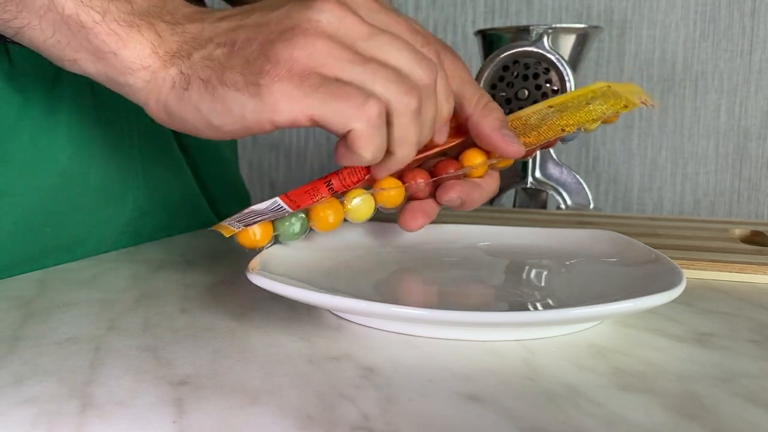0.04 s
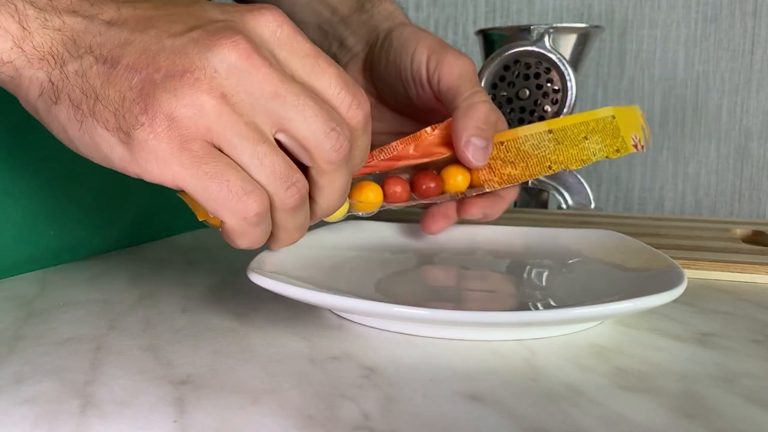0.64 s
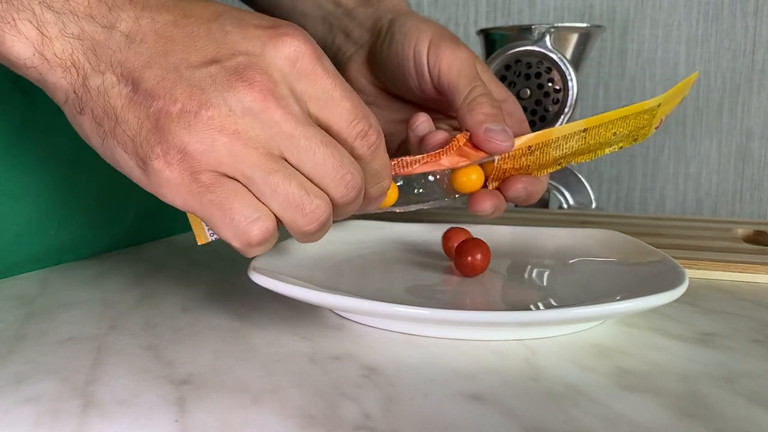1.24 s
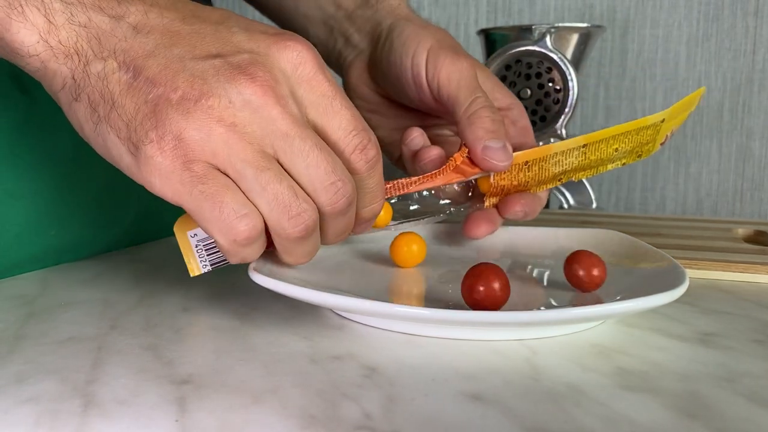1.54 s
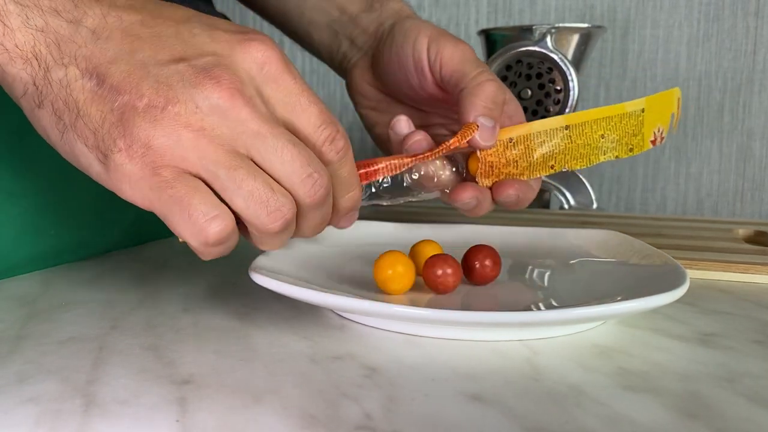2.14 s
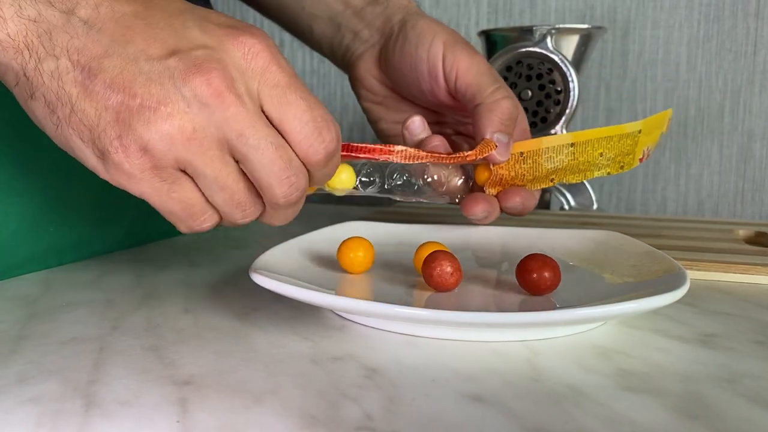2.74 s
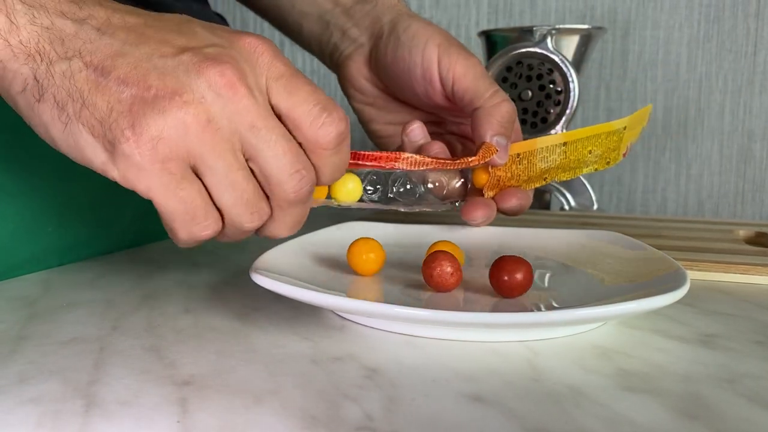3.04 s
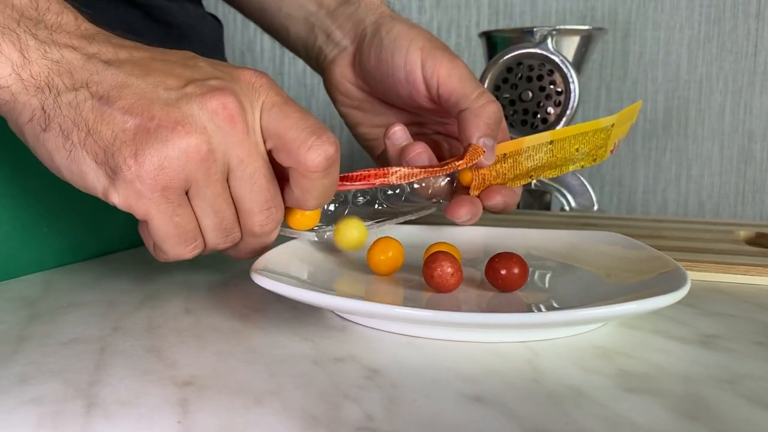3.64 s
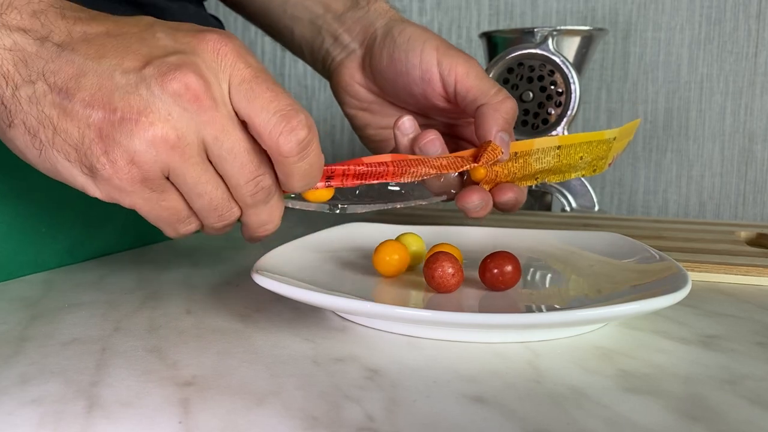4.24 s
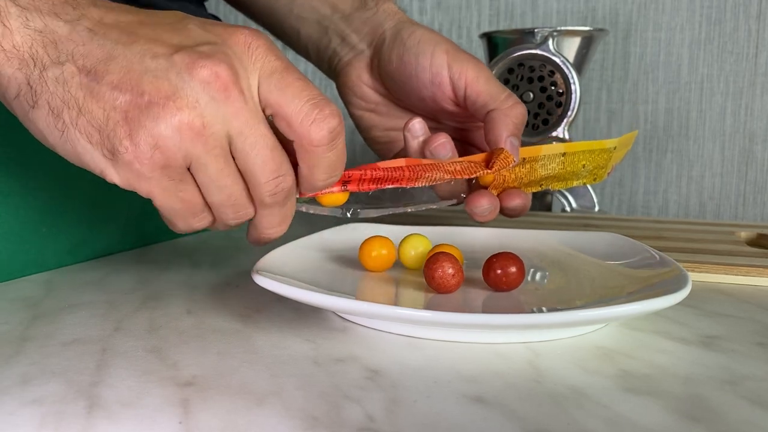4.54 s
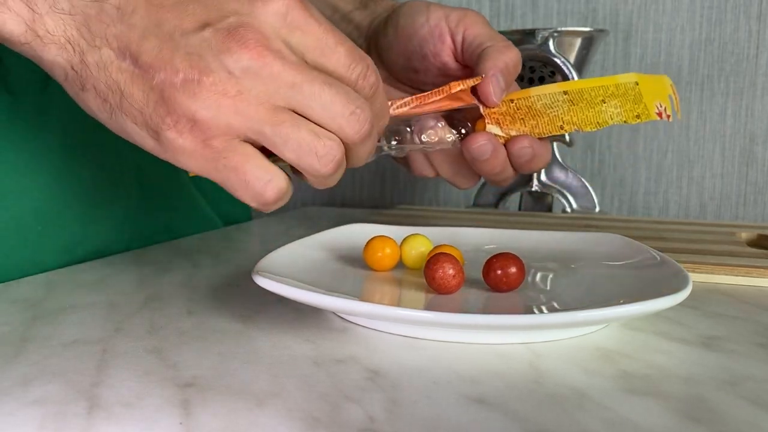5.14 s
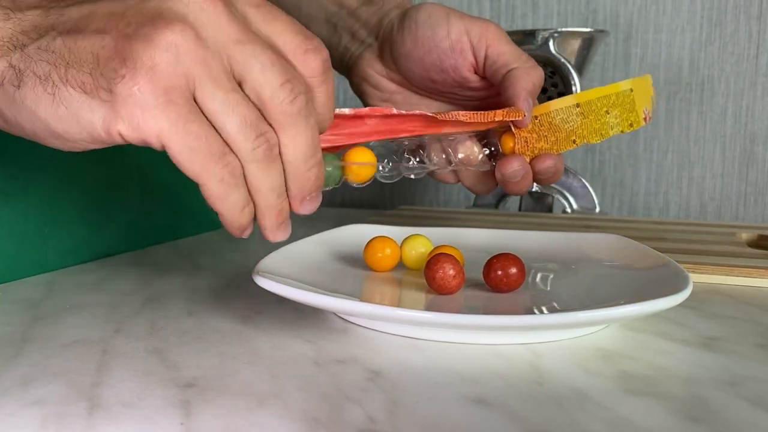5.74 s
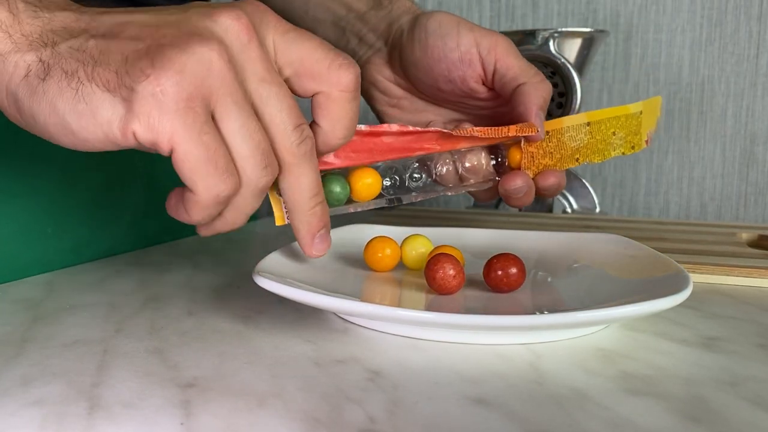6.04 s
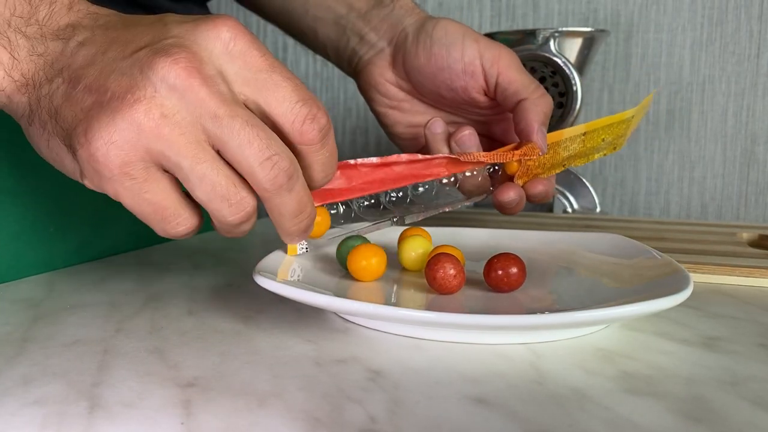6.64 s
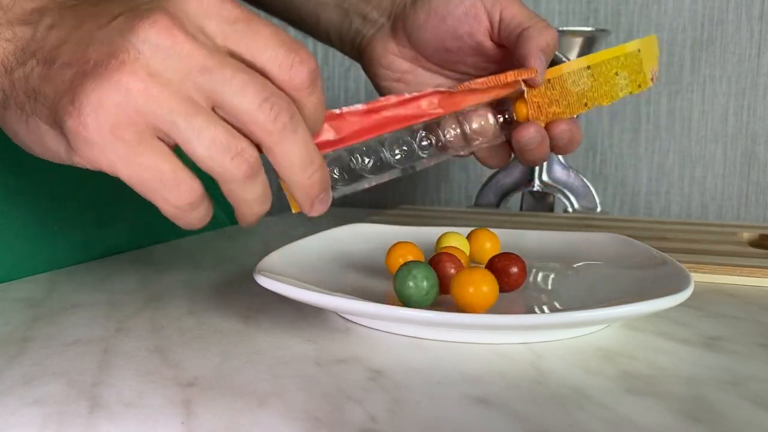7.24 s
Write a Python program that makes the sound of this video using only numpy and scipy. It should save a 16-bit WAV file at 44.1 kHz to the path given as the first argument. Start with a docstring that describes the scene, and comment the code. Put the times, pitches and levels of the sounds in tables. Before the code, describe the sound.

Foil rustles and stiff plastic crackles as a blister strip is opened by hand, heard up close over a quiet kitchen hum. Four hard candies drop early onto a ceramic plate, each with a knock and a ring. Another follows amid a busy run of sharp plastic pops, then three more once the wrapper falls quiet. The small room adds a short echo.

```python
"""Over the quiet hum of a small kitchen, hands peel the foil off a plastic blister strip close to a phone:
the film rustles and the shell buckles in sharp snaps. After a second, four hard candies fall onto a
ceramic plate, which knocks on the stone counter and rings; they hop and roll. The snaps crowd together
as a fifth falls near 3.7 s. From 6.3 s the film is silent, and the last three candies land.
The room answers each snap and clink with a short echo."""
import sys
import numpy as np
from scipy import signal
from scipy.fft import rfft, irfft
from scipy.io import wavfile
from scipy.ndimage import uniform_filter1d, minimum_filter1d

SR = 44100
rng = np.random.default_rng(int(sys.argv[2]) if len(sys.argv) > 2 else 0)


def bounce(signal):
    """Save signal as a 16-bit WAV file at the path given by the first command-line argument."""
    frames = np.transpose(np.atleast_2d(signal))
    limited = np.clip(frames, -1, 1)
    pcm = np.round(limited * 32767).astype(np.int16)
    wavfile.write(sys.argv[1], SR, pcm)


N = 321489

# spectrum of the kitchen's background: (frequency [Hz], relative density [dB])
HUM_COLOUR = [(20, -29), (32, -16), (50, 6), (70, 5.5), (110, -2), (200, -4), (400, -13.5), (560, -2),
              (680, -12.5), (900, -8), (1500, -23), (2700, -26.5), (7000, -41), (16000, -41)]
# spectrum of the kitchen's echo: (frequency [Hz], relative level [dB])
ROOM_COLOUR = [(100, -1.5), (500, 7), (2000, 1), (6000, 6), (15000, -3)]
# reverberation time of the kitchen: (frequency [Hz], t60 [s])
ROOM_T60 = [(150, 0.25), (1000, 0.26), (4000, 0.42), (14000, 0.13)]
# finger strokes along the film: (start [s], length [s], relative rustle [dB], relative fizz [dB])
STROKES = [(0.0, .12, -49.5, -56), (0.228, 0.17, -45, -53), (0.438, 0.12, -52.5, -55.5),
           (0.619, .19, -46, -56.5), (0.884, 0.083, -44, -49), (1.034, 0.15, -51.5, -56),
           (2.069, 0.012, -41, -58), (2.147, 0.014, -44, -54), (2.258, 0.15, -46, -58.5),
           (2.471, 0.15, -59.5, -63), (2.656, 0.066, -55, -66), (2.736, 0.19, -45.5, -58.5),
           (3.138, 0.019, -52.5, -64), (3.237, 0.047, -46, -51), (3.417, 0.051, -52.5, -59),
           (3.504, 0.21, -46, -54), (3.93, 0.1, -52, -46), (4.106, 0.16, -46.5, -54.5),
           (4.247, 0.25, -51.5, -47.5), (4.545, 0.068, -42.5, -43), (4.68, 0.21, -50.5, -58.5),
           (5.023, 0.17, -48, -60.5), (5.168, 0.24, -52, -53), (5.685, .19, -44.5, -49.5),
           (5.773, 0.033, -32, -35), (5.962, 0.048, -49, -49.5), (6.113, 0.015, -48, -60.5),
           (6.207, 0.079, -57, -63)]
# spectrum of the film's papery rustle: (frequency [Hz], relative level [dB])
RUSTLE_COLOUR = [(300, 1), (700, 7.5), (1200, 2), (1900, 7.5), (3000, 3.5), (4500, -3), (7000, -14.5),
                 (10000, -44)]
# spectrum of the film's fine fizz: (frequency [Hz], relative level [dB])
FIZZ_COLOUR = [(3000, -17), (6000, -7.5), (8500, -5.5), (11500, -6), (15500, -6.5), (17000, -40)]
# buckles of the shell: (time [s], relative body level [dB], body centre [Hz],
# body half-width [octaves], relative crack level [dB], body t60 [ms])
SNAPS = [(0.2467, -25, 1080, 1.3, -35, 3.2), (0.368, -36.5, 2080, 1, -55, 22),
         (0.4587, -35.5, 2630, 0.26, -46, 11), (0.4737, -27, 3900, 1.04, -58, 1.6),
         (0.8564, -32.5, 1380, 1.3, -52, 5.7), (0.8991, -23, 3150, 1.07, -45.5, 3.7),
         (1.037, -39, 2660, 2.7, -31.5, 5.8), (1.349, -32, 3240, 1.9, -34, 2.4),
         (1.3631, -32, 2010, 0.98, -42, 3), (2.1061, -37, 2080, 0.79, -46, 3.5),
         (2.3342, -30.5, 1430, 1.18, -43, 32), (2.5397, -35, 1908, 1.02, -57, 4.1),
         (2.634, -34.5, 3770, 0.37, -71, 8.1), (2.7175, -39, 1915, 2.2, -31, 2.5),
         (2.808, -26.5, 2333, 1.35, -52, 11), (2.838, -21, 1630, 0.7, -22.5, 25),
         (3.018, -27.5, 7300, 2, -44, 2.3), (3.032, -35.5, 3400, 0.99, -35, 1.8),
         (3.2393, -27.5, 4700, 0.98, -35.5, 17), (3.2807, -31, 3750, 1.24, -51, 4.2),
         (3.3008, -30.5, 960, 0.92, -50, 6), (3.3136, -31.5, 2535, 0.91, -47, 4),
         (3.4249, -30, 5050, 0.37, -62, 0.92), (3.4442, -34.5, 2160, 0.75, -39.5, 6.3),
         (3.5316, -25.5, 3140, 0.68, -64, 3.8), (3.5477, -28.5, 3380, 3.9, -20, 7),
         (3.5766, -31, 4200, 0.25, -23, 2.2), (3.5941, -19.5, 2940, 8.4, -28, 10),
         (3.628, -28.5, 2520, 1.2, -56, 1.2), (3.9167, -24, 1600, 1.7, -32.5, 9.3),
         (3.9246, -26.5, 2000, 1.6, -40, 16), (3.9342, -24, 2580, 0.59, -30, 9),
         (3.9625, -13.5, 1660, 1.66, -26, 12), (4.0055, -24, 2090, 1.2, -41, 7),
         (4.17, -37.5, 3304, 0.44, -35.5, 3), (4.2475, -33.5, 1540, 2.1, -17.5, 6.9),
         (4.2674, -23, 2100, 1.5, -26, 4), (4.3124, -28, 2450, 1.1, -33, 8.7),
         (4.3199, -28.5, 1850, 1.17, -40, 25), (4.417, -29, 6140, 0.57, -47, 1.9),
         (4.4507, -20.5, 2150, 1.55, -18, 9.5), (4.573, -21.5, 1960, 1.6, -46, 6.9),
         (4.607, -33, 3900, 4.9, -38, 4.6), (4.709, -39.5, 2370, 0.84, -30.5, 4.7),
         (4.8166, -34, 2570, 0.96, -40, 29), (4.9277, -38, 4755, 2.6, -36, 4.2),
         (5.1673, -14.5, 1660, 0.65, -29, 13), (5.2409, -24.5, 2360, 0.63, -33, 2),
         (5.3427, -36, 1604, 1.04, -25.5, 4.9), (5.3514, -30, 3700, 0.43, -21, 4),
         (5.604, -31, 3390, 0.44, -74, 4), (5.6958, -34.5, 3430, 0.9, -56.5, 7),
         (5.7374, -31, 2420, .5, -27, 5.5), (5.748, -25, 4370, 0.51, -20, 7.7),
         (5.7698, -29, 5700, 0.8, -47, 9.4), (5.8055, -19, 3840, 0.68, -24, 20),
         (5.9755, -30, 2740, 0.25, -22.5, 12), (6.4432, -32.5, 1180, 1.3, -67, 30)]
# modes that ring at each landing, those of the plate on the counter and, at 7350 Hz, the candy's own short
# ring: (frequency [Hz], relative level [dB], t60 [s])
PLATE_MODES = [(218, -2, .22), (262, -8, .12), (334, -15, .22), (502, -3, .09), (580, -3, .07),
               (700, -1, .05), (926, -8, .07), (1260, -10, .08), (1480, -8, .09), (1810, -6, .03),
               (2690, 0, .05), (4580, -2, .05), (7350, 6, .035), (2620, 1, .25), (2633, -14, .7),
               (2815, -2, .26), (2818, -16, .75), (4355, -2, .24), (4503, 5, .16), (4509, -7, .55),
               (6330, -7, .34), (6708, -7, .36), (7140, -10, .34), (7220, 1, .28), (8450, 1, .25),
               (9490, 0, .24), (10290, -7, .3), (10995, 4, .26), (12085, -9, .24), (12660, -11, .16),
               (13910, -11, .2), (14330, 1, .14), (14590, -5, .16), (15210, -12, .18)]
# borders between the seven groups of modes, the lowest group being the knock: (frequency [Hz])
GROUP_EDGES_HZ = [2300, 2720, 3500, 4430, 5500, 8000]
# candies landing; the spot struck decides how hard each group of modes rings:
# (time [s], relative tick level [dB], knock gain [dB], six ring gains from low to high [dB])
DROPS = [ (1.0848, -21, -28.5, -18, -23.5, -39, -19, -29.5, -39.5),
         (1.1945, -31, -30, -33, -22.5, -33, -25, -31, -35.5),
         (1.3727, -25.5, -27, -23, -25, -26, -23.5, -24, -35),
         (1.6864, -28, -30.5, -22.5, -40, -27, -26.5, -34, -40.5),
         (3.6639, -25, -25, -52, -22.5, -38, -32, -35.5, -41.5),
         (6.4552, -23.5, -25, -39, -27, -30, -30, -28.5, -45),
         (6.613, -21.5, -26.5, -70, -23, -38.5, -35, -34, -40.5),
         (6.809, -28.5, -27.5, -54, -26.5, -41, -40, -40.5, -55)]
# candies hopping once more where they landed: (time [s], tick level below the landing [dB])
BOUNCES = [(1.415, 14), (1.816, 11), (3.7243, 22)]
# spectrum of the hard contact of candy on glaze: (frequency [Hz], relative level [dB])
TICK_COLOUR = [(120, -1), (280, 10), (600, 10.5), (1500, 4.5), (3500, 1), (5000, 0.5), (8000, 3.5),
               (12000, -11), (16000, -17.5)]
# level difference between the two microphone ports: (frequency [Hz], left minus right [dB])
PORT_BALANCE = [(60, -2), (200, 0), (380, 1), (600, 6), (1200, 6.5), (2400, 2.5), (4400, 7.5), (8000, -1),
                (15000, 0)]
# phase difference between left and right: (frequency [Hz], lead of the left [rad])
STEREO_PHASE = [(0, 0), (1600, .1), (2100, .6), (5400, -.2), (6400, .2), (7500, -.5), (8400, -2.6),
                (9560, -3.5), (10500, -5.8), (11600, -6.7), (12700, -8.9), (13700, -9.7), (14800, -12.3)]

SIDES = np.array([[.5], [-.5]])  # splits a difference between left and right
LN_1000 = np.log(1000)  # amplitude falls by 60 dB in one t60


def undb(db):
    """Amplitude ratio of a level in decibels."""
    return 10 ** (np.asarray(db) / 20)


def unit(x):
    """Normalisation to rms 1."""
    return x / np.sqrt(np.mean(x ** 2) + 1e-20)


def freqs(x):
    """Fourier frequencies of x, floored at 1 Hz."""
    return np.maximum(np.fft.rfftfreq(x.shape[-1], 1 / SR), 1)


def read(points, hz):
    """Linear interpolation of (frequency [Hz], value) points on a log frequency axis."""
    at, value = np.transpose(points)
    return np.interp(np.log(hz), np.log(np.maximum(at, 1)), value)


def shape(x, gain):
    """Linear filtering: the spectrum is multiplied by a gain at each frequency."""
    return irfft(rfft(x) * gain, x.shape[-1])


def colour(x, points):
    """Spectral weighting by (frequency [Hz], level [dB]) points."""
    return shape(x, undb(read(points, freqs(x))))


def bell(hz, octaves):
    """Response curve of a broad resonance, about 6 dB down at `octaves` from its centre."""
    return lambda f: (1 + (np.log2(f / hz) / (2 * max(octaves, .2))) ** 2) ** -3


def resonance(x, hz, width_hz):
    """Forced response of a damped oscillator, with gain 1 at its centre."""
    return signal.lfilter(*signal.iirpeak(hz, hz / width_hz, fs=SR), x)


def stereo_noise(size, apart):
    """Partly coherent noise: `apart` is the ratio of side to mid amplitude."""
    mid, side = rng.standard_normal((2, size))
    return unit(mid + apart * np.array([[1], [-1]]) * side)


def wander(rows, size, per_s):
    """Random modulation: slow curves with a spread near 1."""
    step = int(SR / per_s)
    held = np.repeat(rng.standard_normal((rows, 256))[:, :size // step + 1], step, axis=1)
    return uniform_filter1d(held, step, axis=1)[:, :size]


def add(track, s, sound):
    """Superposition of a sound on the track at s seconds."""
    start = max(int(s * SR), 0)
    part = sound[..., :max(N - start, 0)]
    track[:, start:start + part.shape[-1]] += part


def add_burst(track, s, gain_at, t60_ms, db, apart, size=2048):
    """Damped noise transient coloured by gain_at(Hz); db is the level of its energy spread over 5 ms."""
    lead_s, span_s = .004, .005
    t = np.arange(size) / SR - lead_s
    decay = (t >= 0) * np.exp(-LN_1000 * np.abs(t) * 1000 / max(t60_ms, 1))
    burst = stereo_noise(size, apart) * decay
    burst = unit(shape(burst, gain_at(freqs(burst)))) * np.sqrt(span_s * SR / size)
    add(track, s - lead_s, burst * undb(db))


def hum(level_db=-50.6):
    """Stationary noise: the household background, with its power mostly at low frequencies."""
    return unit(colour(stereo_noise(N, apart=0.36), HUM_COLOUR)) * undb(level_db)


def kitchen_echo(x, wet_db, build_s=0.0006):
    """Reverberation: the diffuse field of a small hard room decays exponentially, the top fastest."""
    t = np.arange(SR // 2) / SR
    noise = stereo_noise(len(t), apart=0.88)
    tail = 0
    for k, (_, t60) in enumerate(ROOM_T60):
        band = read([(hz, float(j == k)) for j, (hz, _) in enumerate(ROOM_T60)], freqs(noise))
        tail = tail + shape(noise, band) * np.exp(-LN_1000 * t / t60)
    onset = 1 - np.exp(-t / build_s)
    response = unit(colour(tail, ROOM_COLOUR) * onset) / np.sqrt(len(t))
    return undb(wet_db) * signal.fftconvolve(x, response, axes=1)[:, :N]


def counter_reflection(x, lag_s=0.003, reflection_db=-14):
    """Interference: the direct sound adds to its delayed reflection from the worktop."""
    return x + undb(reflection_db) * shape(x, np.exp(-2j * np.pi * freqs(x) * lag_s))


def stroke_envelope(start, length, attack_s=0.0073, fall_db_per_s=238):
    """Envelope of a stroke: linear rise, hold and exponential decay."""
    t = np.arange(N) / SR - start
    return np.clip(t / attack_s, 0, 1) * undb(-fall_db_per_s * np.maximum(t - length, 0))


def friction(per_s=600, spread_db=5.5, tint_db=7.0):
    """Stick-slip friction: tiny unequal slips, each favouring its own resonances, over a smooth hiss."""
    at = rng.permutation(N)[:int(per_s * N / SR)]
    size_db = spread_db * np.minimum(rng.exponential(size=N), 3)[at]
    crackle = np.zeros(N)
    for hz in np.geomspace(1000, 14000, 9):
        slips = np.zeros(N)
        slips[at] = undb(size_db + tint_db * rng.standard_normal(N)[at]) * rng.choice([-1, 1], N)[at]
        crackle += resonance(slips, hz, hz / 3)
    return unit(crackle) + stereo_noise(N, apart=0.5)


def film(rustle_gain_db=-2.5, fizz_gain_db=1.0):
    """Friction noise: as the foil slides and peels, the same slips give a rustle and a finer fizz."""
    grip = (0, 6.3, -58, -67)  # one long faint stroke: the strip whispers until it is tipped
    rustle_envelope, fizz_envelope = 0, 0
    for start, length, rustle_db, fizz_db in [*STROKES, grip]:
        effort = stroke_envelope(start, length)
        rustle_envelope = np.maximum(rustle_envelope, effort * undb(rustle_db))
        fizz_envelope = np.maximum(fizz_envelope, effort * undb(fizz_db))
    slips = friction()
    rustle = unit(colour(slips, RUSTLE_COLOUR)) * rustle_envelope * undb(rustle_gain_db)
    fizz = unit(colour(slips, FIZZ_COLOUR)) * fizz_envelope * undb(fizz_gain_db)
    return rustle + fizz


def creases(per_s=14, body_gain_db=1.5, crack_gain_db=2, scatter_db=4.5, hz=2300, octaves=1.6, t60_ms=6):
    """Small-scale buckling: creases give way at random moments of the strokes; rows as in SNAPS."""
    rows = []
    for start, length, rustle_db, fizz_db in STROKES:
        draws = np.column_stack([rng.random(8), rng.standard_normal((8, 3))])
        for when, body, pitch, crack in draws[:int(round(per_s * length))]:
            body_db = rustle_db + body_gain_db + scatter_db * body
            crack_db = fizz_db + crack_gain_db + scatter_db * crack
            rows.append((start + when * length, body_db, hz * 2 ** (pitch / 2), octaves, crack_db, t60_ms))
    return rows


def shell(buckles, body_gain_db=-0.02, crack_gain_db=-3.5, crack_t60_ms=5.6, rebound_s=0.003):
    """Snap-through buckling: a panel flips with a damped note and a bright crack, then springs back."""
    out = np.zeros((2, N))
    crack_band = lambda f: 1 / np.sqrt(1 + (7500 / f) ** 6 + (f / 12500) ** 4)
    for s, body_db, hz, octaves, crack_db, t60_ms in buckles:
        force_db = body_db + 25  # relative to a middling buckle
        panned_db = body_db + rng.normal(3.5, 0.2) * SIDES  # louder on the left
        rebound_db = min(-8 - 0.2 * force_db, 0)
        for at, flip_db in (s, 0), (s + rebound_s, rebound_db):
            add_burst(out, at, bell(hz, octaves), t60_ms, panned_db + body_gain_db + flip_db, apart=0.4)
            add_burst(out, at, crack_band, crack_t60_ms, crack_db + crack_gain_db + flip_db, apart=.15)
        thump_db = panned_db - 20 + 0.93 * force_db  # hard buckles jolt the whole strip in the hand
        add_burst(out, s, bell(hz=600, octaves=0.65), t60_ms=24, db=thump_db, apart=0.26)
    return out


def hollow_pop(x, pop_db=-4, dip_share=0.42):
    """Resonance and notch: the snaps get a hollow pop near 1.9 kHz and are thinner near 1.3 kHz."""
    pop = undb(pop_db) * resonance(x, hz=1880, width_hz=260)
    dip = dip_share * resonance(x, hz=1280, width_hz=350)
    return x + pop - dip


def rolling(level_db=-54, crowd_db=0.61, fall_db_per_s=32, ticks_per_s=300, dull_hz=3500, tick_db=-6):
    """Random excitation: rolling candies tick and keep the plate faintly ringing, more so as it fills."""
    t = np.arange(N) / SR
    rolls = [(t > s) * undb(crowd_db * k - fall_db_per_s * np.abs(t - s))
             for k, (s, *_) in enumerate(DROPS)]
    ticks = (rng.random(N) < ticks_per_s / SR) * undb(4 * rng.standard_normal(N))
    ticks = shape(ticks, 1 / (1 + (freqs(ticks) / dull_hz) ** 4))
    rings = sum(resonance(ticks, hz, width_hz=60) for hz, _, _ in PLATE_MODES)
    return (unit(rings) + undb(tick_db) * unit(ticks)) * np.max(rolls, axis=0) * undb(level_db)


def landings(dulling_db_per_group=3.5):
    """Inelastic impact: all drops, plus each bounce as a softer, duller copy of the drop before it."""
    rows = list(DROPS)
    for s, softer_db in BOUNCES:
        _, *levels = [drop for drop in DROPS if drop[0] < s][-1]
        loss_db = softer_db + dulling_db_per_group * np.arange(len(levels))
        rows.append((s, *(np.array(levels) - loss_db)))
    return rows


def plate(scatter_db=2.3, tick_t60_ms=11.0, tick_gain_db=3.0, waver_db=3.5):
    """Modal vibration: each candy ticks on the glaze and sets the plate knocking and ringing."""
    out = np.zeros((2, N))
    hz, mode_db, t60 = np.transpose(PLATE_MODES)
    group = np.digitize(hz, GROUP_EDGES_HZ)
    t = np.arange(SR * 2 // 3) / SR
    decay = np.exp(-LN_1000 * t / t60[:, None])
    tick_band = lambda f: undb(read(TICK_COLOUR, f))
    for s, tick_db, *group_db in landings():
        sign = np.where(group == 0, rng.choice([-1, 1], len(hz)), (-1) ** group)
        amplitude = undb(mode_db + np.array(group_db)[group] + scatter_db * rng.standard_normal(len(hz)))
        # candies rolling over the plate make each ring waver in strength and pitch
        swell = 1 + (undb(waver_db) - 1) * wander(len(hz), len(t), per_s=45)
        drift_rad = wander(len(hz), len(t), per_s=45)
        phase = 2 * np.pi * hz[:, None] * t + (drift_rad - drift_rad[:, :1])
        rings = np.sin(phase.astype(np.float32)) * decay * swell
        add(out, s, (sign * amplitude) @ rings)
        add_burst(out, s, tick_band, tick_t60_ms, tick_db + tick_gain_db, apart=0.17)
    return out


def cut_deep_bass(x, corner_hz=185):
    """High-pass filter: the plate's sound carries no deep bass."""
    return signal.sosfilt(signal.butter(6, corner_hz, "high", fs=SR, output="sos"), x)


def lean_left(x):
    """Level difference: most frequencies reach the left port more strongly."""
    return shape(x, undb(SIDES * read(PORT_BALANCE, freqs(x))))


def limiter(x, ceiling=.88, window=221):
    """Peak limiting: the phone lowers its gain for a few milliseconds around the highest peaks."""
    gain = ceiling / np.maximum(np.abs(x).max(axis=0), ceiling)
    return x * uniform_filter1d(minimum_filter1d(gain, window), window)


def scene():
    """Superposition: hum, film, shell and plate add to the echoes of the snaps and clinks."""
    clinks = lean_left(cut_deep_bass(plate() + rolling()))
    rustle_and_hum = lean_left(film() + hum())
    clinks = clinks + kitchen_echo(clinks, wet_db=-11.5)
    snaps = hollow_pop(shell([*SNAPS, *creases()]))
    snaps = counter_reflection(snaps) + kitchen_echo(snaps, wet_db=-13)
    return rustle_and_hum + snaps + clinks


def record(dry, top_hz=16300):
    """Phase shift: the treble is out of step between left and right; peaks are limited, the top cut."""
    lead_rad = read(STEREO_PHASE, freqs(dry))
    shifted = shape(dry, np.exp(1j * SIDES * lead_rad))
    lowpass = signal.ellip(8, .2, 70, top_hz, fs=SR, output="sos")
    return signal.sosfilt(lowpass, limiter(shifted))


dry = scene()
out = record(dry)
bounce(out)
```